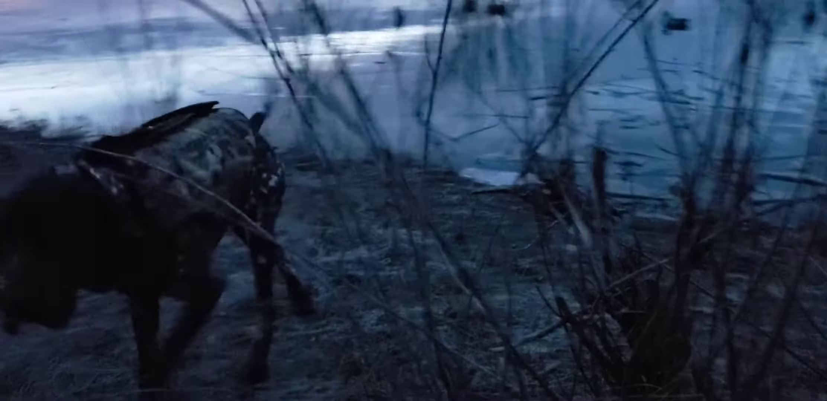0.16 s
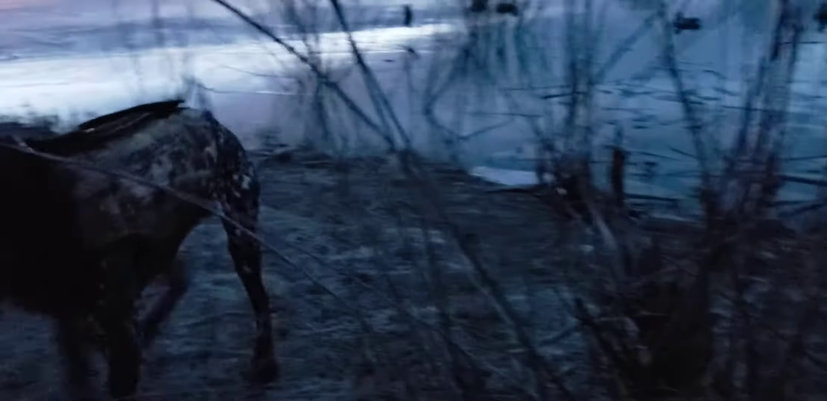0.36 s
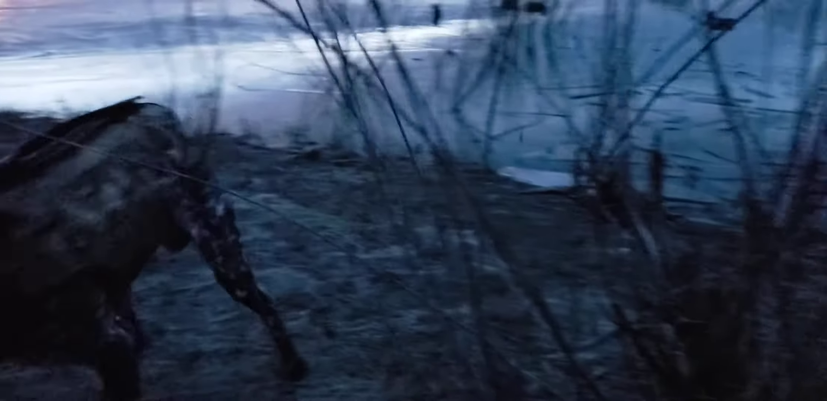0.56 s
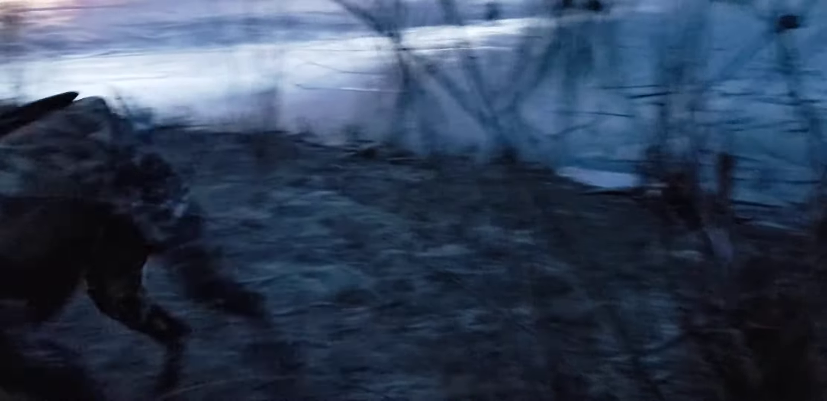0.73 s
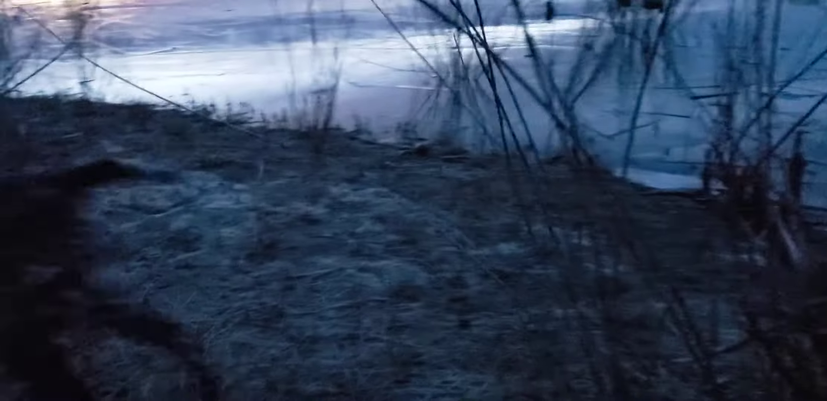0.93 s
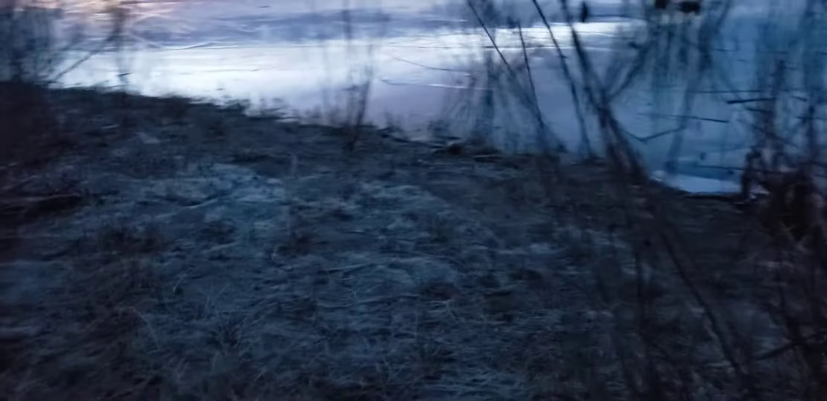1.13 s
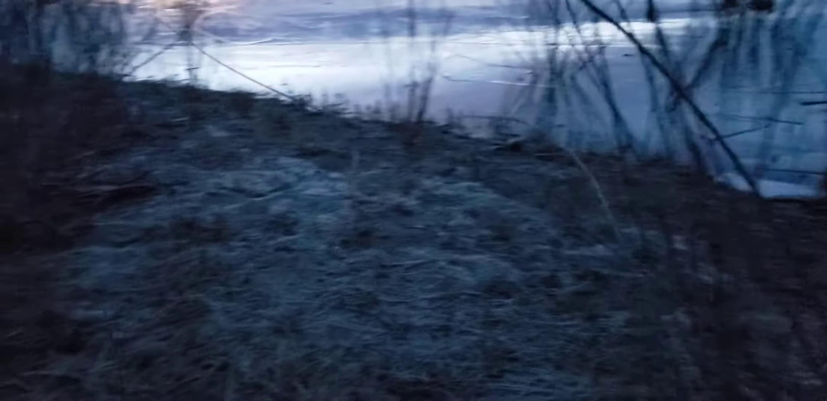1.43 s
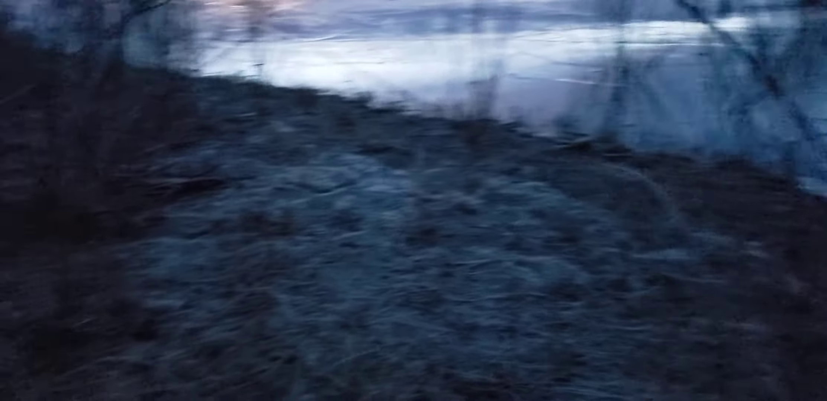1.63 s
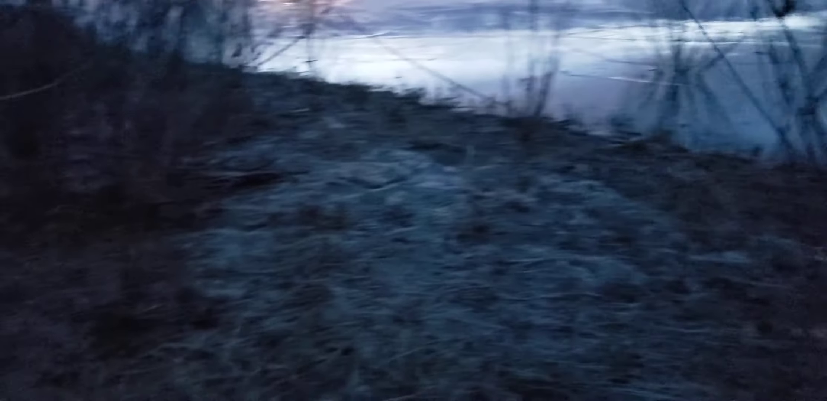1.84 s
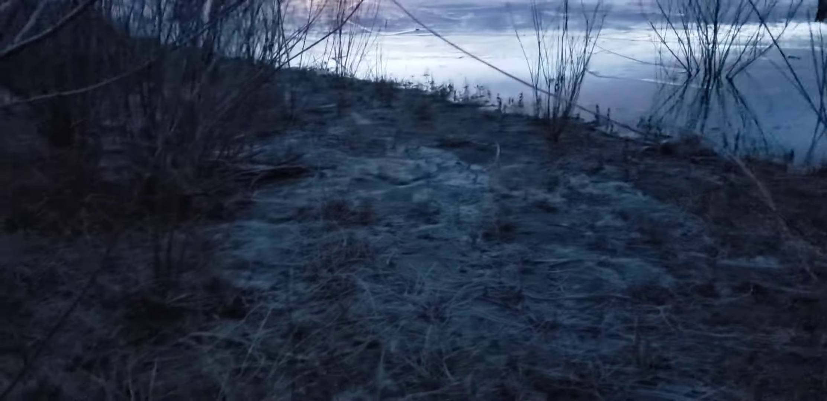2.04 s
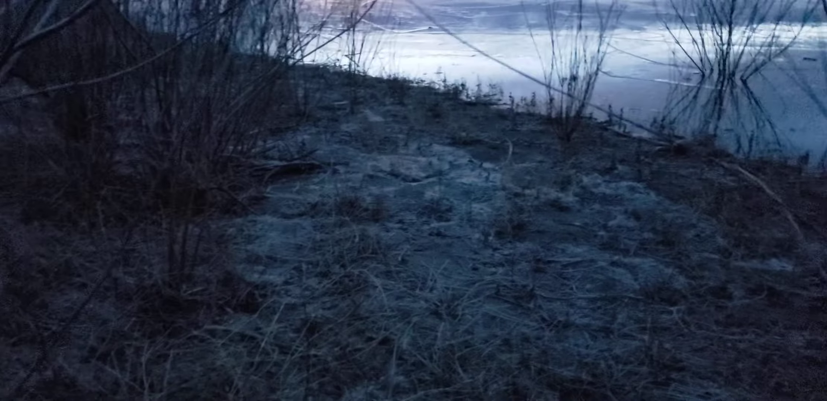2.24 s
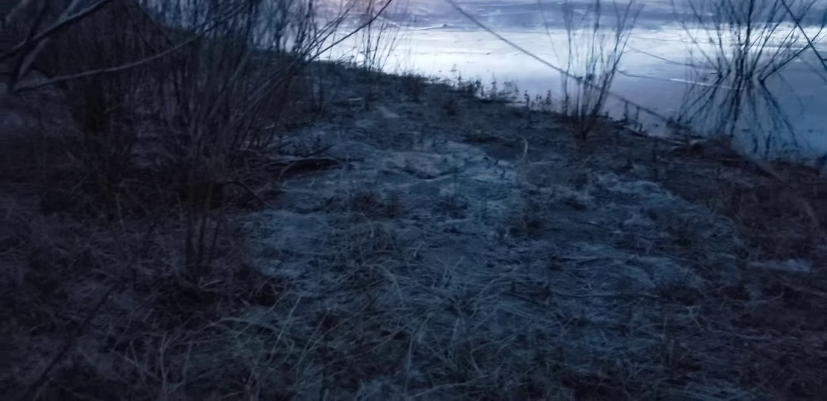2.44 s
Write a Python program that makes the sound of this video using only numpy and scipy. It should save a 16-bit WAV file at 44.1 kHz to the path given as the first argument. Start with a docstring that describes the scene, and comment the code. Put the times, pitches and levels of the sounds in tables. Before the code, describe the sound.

Crisp crackling of frozen grass and dry brush as a dog trots past, with sharp stem snaps

```python
"""A dog trots over frost-stiff grass and through dry brush, heard from a small hand-held camera.
A faint low hush and dull thuds, mostly in the right port, run throughout; a soft hoot rises early.
First two stems splinter close by, then ice-stiff blades snap and rustle further left.
Grass is noise shaped by breaks, twangs and thuds are damped sines, the hush is coloured noise."""
import sys
import numpy as np
from scipy import signal
from scipy.fft import rfft, irfft, next_fast_len
from scipy.io import wavfile

SR = 44100
rng = np.random.default_rng(int(sys.argv[2]) if len(sys.argv) > 2 else 0)


def int16_out(signal):
    """Quantize to a 16-bit WAV file."""
    q = np.round(np.clip(np.atleast_2d(signal).T, -1, 1) * 32767)
    wavfile.write(sys.argv[1], SR, q.astype(np.int16))


N = 112455


def amp(db):
    """dB to gain."""
    return 10 ** (np.asarray(db) / 20)


def unit(x):
    """Scale to rms 1."""
    return x / np.sqrt(np.mean(x ** 2) + 1e-20)


def coloured(x, points):
    """Filter x by a minimum-phase response of energy 1 through (Hz, dB) points."""
    point_hz, point_db = np.transpose(points)
    hz = np.fft.rfftfreq(8192, 1 / SR)
    db = np.interp(np.log(hz + 1), np.log(point_hz + 1), point_db)
    cepstrum = irfft(np.log(amp(db) + 1e-4))
    cepstrum[1:4096] *= 2  # fold to minimum phase
    cepstrum[4097:] = 0
    response = irfft(np.exp(rfft(cepstrum)))
    response /= np.linalg.norm(response)
    return signal.fftconvolve(x, response[None], axes=1)[:, :N]


def pair(shared):
    """White noise for two ports with a shared fraction of power."""
    noise = rng.standard_normal((3, N))
    return np.sqrt(shared) * noise[0] + np.sqrt(1 - shared) * noise[1:]


def crackle(per_s, spread_db, t60_s, bed):
    """Envelope of rms 1: random decaying breaks of uneven size over a steady bed."""
    struck = rng.random(N) < per_s / SR
    size = np.minimum(rng.exponential(size=N), 4)
    hits = struck * amp(2 * spread_db * size)
    power = signal.lfilter([1], [1, -amp(-120 / (t60_s * SR))], hits)
    return unit(np.sqrt(power / power.mean() + bed))


# Four bands throughout the grass: treble, middle, lower middle, body
BODY_DB = -8.5  # body of crunches, snaps and cracks re their lower middle

# Grass rustle: (time [s], treble [dB], middle [dB], lower middle [dB], body [dB])
RUSTLE_LEVELS = [(0.0, -54.5, -61.5, -79, -80), (0.09, -53.5, -62, -82, -81), (0.22, -47, -52, -69, -71),
                 (0.34, -51.5, -55, -73, -71.5), (0.55, -50, -53.5, -66, -63.5),
                 (0.82, -45.5, -51, -61, -59), (1.01, -47, -54, -60.5, -65.5),
                 (1.16, -42, -47, -59.5, -61.5), (1.26, -39.5, -47, -56, -69),
                 (1.38, -37, -42.5, -49.5, -59.5), (1.46, -35.5, -42.5, -53.5, -60),
                 (1.65, -42, -50, -57, -66), (1.84, -44.5, -50, -58.5, -78), (1.96, -38, -45.5, -51, -51.5),
                 (2.05, -44.5, -48.5, -53, -55), (2.16, -51.5, -55.5, -61, -69),
                 (2.35, -45.5, -54, -61, -77), (2.4, -52, -59, -71, -86), (2.55, -43, -49.5, -55.5, -76)]


def rustle_power():
    """Many small blade contacts: crackling band power on slow level curves."""
    t = np.arange(N) / SR
    time_s, *levels_db = np.transpose(RUSTLE_LEVELS)
    grains = [amp(np.interp(t, time_s, db)) * crackle(per_s=300, spread_db=3.5, t60_s=0.039, bed=1)
              for db in levels_db]
    return np.array(grains) ** 2


# Drawn-out crunches: (start [s], length [s], treble [dB], middle re treble [dB],
# lower middle re treble [dB], rise and fall [s])
CRUNCH_EVENTS = [(0.236, 0.031, -34, -1, -10, 0.0026), (0.246, 0.015, -32.5, -8, -15, 0.003),
                 (0.303, 0.051, -45, -14, -40, 0.012), (0.388, 0.032, -31.5, -8.5, -15, 0.0077),
                 (0.404, 0.014, -29, -8, -17.5, 0.0032), (0.657, 0.066, -49, -5, -8, 0.004),
                 (0.828, 0.059, -41.5, -6.5, -11.5, 0.0012), (0.917, 0.066, -43, -2, -10, 0.0042),
                 (1.07, 0.039, -35, -7, -27, 0.0074), (1.136, 0.045, -41, -7.5, -11, 0.0049),
                 (1.327, 0.0089, -21.5, -11, -22, 0.0025), (1.497, 0.024, -34.5, -14, -13, 0.0052),
                 (1.508, 0.069, -36.5, -6.5, -18.5, 0.017), (1.624, 0.047, -41.5, -4, -18, 0.0042),
                 (1.752, 0.039, -42.5, -4.5, -15.5, 0.0031), (1.836, 0.14, -37.5, -2, -6, 0.043),
                 (2.226, 0.047, -36, -9.5, -45, 0.015), (2.438, 0.038, -46.5, 0.5, -22, 0.0023)]


def crunch_power():
    """Dense splintering: fast crackle gated by trapezoids."""
    t = np.arange(N) / SR
    splinters = crackle(per_s=1300, spread_db=3.6, t60_s=0.014, bed=1)
    power = np.zeros((4, N))
    for start_s, length_s, db, mid_db, low_db, edge_s in CRUNCH_EVENTS:
        gate = np.clip(np.minimum(t - start_s, start_s + length_s - t) / edge_s, 0, 1)
        gains = amp(db + np.array([0, mid_db, low_db, low_db + BODY_DB]))
        power += np.outer(gains, gate * splinters) ** 2
    return power


# Blade and twig snaps: (time [s], level [dB], lower middle re level [dB],
# middle re level [dB], t60 [s]); SNAP_BAND_DB is added per band
SNAP_EVENTS = [(0.098, -30.5, -57, -21, 0.031), (0.77, -28, -34, -16, 0.03), (0.7852, -27, -18, -16, 0.081),
               (0.8113, -20.5, -13.5, -13.5, 0.033), (0.8266, -23, -21, -15, 0.043),
               (0.84, -27.5, -19.5, -12.5, 0.12), (0.856, -20, -17.5, -13, 0.033),
               (0.866, -28, -26, 0, 0.017), (0.9536, -21.5, -12, -12.5, 0.029),
               (1.051, -25.5, -51, -19.5, 0.069), (1.092, -24, -19.5, -20, 0.029),
               (1.112, -25, -37, -18, 0.023), (1.1418, -18, -33, -19, 0.049), (1.165, -24, -19, -13, 0.025),
               (1.1889, -18.5, -48, -22, 0.034), (1.2354, -19.5, -29, -26, 0.026),
               (1.245, -18.5, -28.5, -16, 0.029), (1.2892, -21, -42, -20.5, 0.025),
               (1.336, -17.5, -28, -23, 0.031), (1.37, -17, -24, -21, 0.034),
               (1.4342, -16.5, -23.5, -21, 0.033), (1.5865, -18.5, -29, -24, 0.037),
               (1.8986, -17.5, -9, -16, 0.013), (1.8238, -30, -22.5, -16.5, 0.12),
               (1.9215, -17, -14.5, -14, 0.022), (2.0145, -19.5, -11, -5, 0.019),
               (2.0195, -28, -15, -12, 0.036), (2.424, -36, -31, -11, 0.017)]
SNAP_BAND_DB = (-5, 5.5, 1)  # (treble [dB], middle [dB], lower middle [dB])
SNAP_RISE_S = 0.0006


def snap_power():
    """Sudden breaks: band power with a fast rise and exponential decay."""
    power = np.zeros((4, N))
    u = np.arange(SR // 10) / SR
    treble_db, middle_db, lower_db = SNAP_BAND_DB
    for time_s, db, low_db, mid_db, t60_s in SNAP_EVENTS:
        shape = amp(-60 * u / t60_s) * (1 - np.exp(-u / SNAP_RISE_S))
        low = lower_db + low_db
        gains = amp(db + np.array([treble_db, middle_db + mid_db, low, low + BODY_DB]))
        start = round(time_s * SR)
        power[:, start:start + len(u)] += np.outer(gains, shape) ** 2
    return power


# Single hard breaks: (time [s], treble [dB], middle re treble [dB], lower middle re treble [dB]);
# levels at burst start, before band colour
CRACK_EVENTS = [(.2378, -27, -8, -14), (.2453, -14, -16, -19), (.258, -5, -19, -15), (.393, -18, -16, -22),
                (.3958, -21, -12, -20), (.4045, -11, -20, -19), (.4063, -12, -20, -26),
                (.410, -14, -16, -9), (.557, -40, -3, -20), (.7245, -38, 0, -18), (.769, -29, 0, -16),
                (.7835, -28, 1, -16), (.8303, -24, -5, -14), (.8585, -25, -2, -12), (1.1478, -19, -7, -20),
                (1.1636, -18, -10, -20), (1.1652, -16, -8, -20), (1.1905, -19, -9, -28),
                (1.328, -15, -11, -19), (1.372, -23, -4, -11), (1.435, -16, -14, -25),
                (1.9102, -23, -8, -14), (2.368, -28, -9, -25), (2.4395, -32, -7, -16),
                (2.444, -27, -9, -16), (2.45, -30, -7, -14)]
CRACK_T60_S = 0.004


def cracks():
    """Very short bursts of random-sign noise, identical in both ports."""
    out = np.zeros((4, 1, N))
    u = np.arange(SR // 200) / SR
    for time_s, db, mid_db, low_db in CRACK_EVENTS:
        burst = amp(-60 * u / CRACK_T60_S) * np.sign(rng.standard_normal(len(u)))
        gains = amp(db + np.array([0, mid_db, low_db, low_db + BODY_DB]))
        start = round(time_s * SR)
        out[:, 0, start:start + len(u)] += np.outer(gains, burst)
    return out


# Relative band spectra: (frequency [Hz], density [dB per Hz])
TREBLE_COLOUR = [(6000, -84), (8200, 0), (9200, 1), (11500, 6.5), (13400, 8), (15000, 12), (16000, 3.5)]
MIDDLE_COLOUR = [(2060, -28.5), (3500, -10.5), (4790, -9), (5420, -7.5), (6760, -2), (7920, -6.5),
                 (8300, -39.5), (10800, -18.5), (18300, -120)]
NEAR_COLOUR = [(700, -19), (1300, -9.5), (1900, -0.5), (2400, -6), (3500, -18), (4550, -43)]  # lower middle of the close stems
LOWER_COLOUR = [(820, -21.5), (1700, -10), (2400, -3.5), (3000, -2.5), (3700, -9), (4550, -63.5)]  # lower middle of the later grass
BODY_COLOUR = [(180, -12), (300, -3.5), (858, 5.5), (1200, -0.5), (1400, 0), (1820, -58), (3080, -120)]
BAND_SHARED = (.45, .5, .55, .8)  # power fraction common to both ports, per band
NEAR_FADE_S = (0.5, 1.65)  # near colour gives way to lower colour


def grass():
    """Summed break power drives noise, cracks join it, and each band gets its colour."""
    power = rustle_power() + crunch_power() + snap_power()
    noise = np.array([pair(shared) for shared in BAND_SHARED])
    treble, middle, lower, body = noise * np.sqrt(power)[:, None] + cracks()
    near = np.interp(np.arange(N) / SR, NEAR_FADE_S, (1, 0))
    return (coloured(treble, TREBLE_COLOUR) + coloured(middle, MIDDLE_COLOUR)
            + coloured(lower * near, NEAR_COLOUR) + coloured(lower * (1 - near), LOWER_COLOUR)
            + coloured(body, BODY_COLOUR))


# Stem twangs: (time [s], starting frequency [Hz], peak level [dB], time to peak [s])
RING_EVENTS = [(.248, 2100, -33.5, 0.00073), (.812, 3340, -37, 0.0011), (1.001, 684, -42, 0.00084),
               (1.331, 2220, -29.5, 0.00056), (1.3415, 4650, -31.5, 0.0019), (1.9102, 3270, -24.5, 0.00029),
               (1.9895, 6600, -45, .0008), (2.028, 2250, -42, 0.0014)]
RING_RISE = 0.032  # fractional pitch climb per time to peak


def rings():
    """A stem twangs at its own climbing pitch, swelling and dying within milliseconds."""
    out = np.zeros(N)
    t = np.arange(SR // 20) / SR
    for time_s, hz, db, peak_s in RING_EVENTS:
        u = t / peak_s
        cycles = hz * t * (1 + RING_RISE * u / 2) + rng.random()
        start = round(time_s * SR)
        out[start:start + len(t)] += amp(db) * u * np.exp(1 - u) * np.sin(2 * np.pi * cycles)
    return out


# Grass position: (time [s], left port lead [ms], left minus right [dB])
PORT_LEAD = [(0, .057, -3), (.55, .057, -3), (.7, .3, 1.6), (1.1, .4, .4), (1.4, .46, .4), (2, .47, 1.3),
             (2.55, .47, .2)]


def spaced(x):
    """The left port hears the grass first, more so as the dog moves left."""
    hz, t, spectrum = signal.stft(x, SR, nperseg=256)
    time_s, lead_ms, pan_db = np.transpose(PORT_LEAD)
    lead_s = np.interp(t, time_s, lead_ms) / 1000
    half_turn = np.exp(1j * np.pi * np.outer(hz, lead_s))  # half the lead per port
    left = half_turn * amp(np.interp(t, time_s, pan_db) / 2)
    return signal.istft(spectrum * [left, 1 / left], SR, nperseg=256)[1][:, :N]


# Thuds: (time [s], peak before trim and pan [dB], frequency [Hz], left minus right [dB])
THUD_EVENTS = [(0.147, -49, 66.6, -24), (0.395, -44.5, 73, -18.5), (0.439, -48, 76.6, -22),
               (0.51, -50.5, 85, -24), (0.655, -53, 107, -20.5), (0.831, -44, 94.5, -10),
               (0.853, -45.5, 181, 0), (0.95, -53, 145, 0), (1.103, -50, 149, -11), (1.352, -47, 97, -13),
               (1.407, -45.5, 88, -14), (1.53, -52.5, 102, -15), (1.588, -43.5, 120, -10),
               (1.76, -58.5, 75.4, -25), (1.899, -47, 245, 4.5), (2.163, -59.5, 77, -38),
               (2.332, -49.5, 92, -18.5), (2.499, -41, 66, 0), (2.528, -43.5, 222, 1)]
THUD_T60_S, THUD_RISE_S, THUD_TRIM_DB = 0.15, 0.0018, -3.5


def thuds():
    """Each thud is a short damped low sine."""
    out = np.zeros((2, N + SR))
    t = np.arange(SR // 4) / SR
    envelope = amp(-60 * t / THUD_T60_S) * (1 - np.exp(-t / THUD_RISE_S))
    for time_s, db, hz, pan_db in THUD_EVENTS:
        swing = envelope * np.sin(2 * np.pi * hz * t)
        swing /= np.abs(swing).max()
        gains = amp(db + THUD_TRIM_DB + np.array([pan_db / 2, -pan_db / 2]))
        start = round(time_s * SR)
        out[:, start:start + len(t)] += np.outer(gains, swing)
    return out[:, :N]


# Hoot: (first frequency [Hz], last frequency [Hz], waver bandwidth [Hz], level before waver [dB])
HOOT = (249.5, 335, 132, -52)
HOOT_START_S, HOOT_END_S = 0.14, 0.31


def hoot():
    """A soft rising sine under a half-sine arch, its amplitude wavered by low noise."""
    first_hz, last_hz, width_hz, db = HOOT
    t = np.arange(N) / SR
    u = np.clip((t - HOOT_START_S) / (HOOT_END_S - HOOT_START_S), 0, 1)
    hz = first_hz + (last_hz - first_hz) * np.minimum(1.81 * u, 1)  # holds after the climb
    phase = 2 * np.pi * np.cumsum(hz) / SR
    waver = 0.5 + coloured(pair(0.64), [(1, 0), (width_hz / 2, 0), (4 * width_hz, -50)])
    return amp(db) * np.sin(np.pi * u) * waver * np.sin(phase)


# Hush spectrum: (frequency [Hz], relative density [dB per Hz])
HUSH_COLOUR = [(25, -45), (54, 4.5), (81, -2.5), (270, -9), (454, -30.5), (600, -25.5), (780, -60),
               (1320, -120)]
# Hush level: (time [s], level before trim and pan [dB])
HUSH_CURVE = [(0.0, -62), (0.08, -73.5), (0.36, -66), (0.6, -69), (1.19, -71.5), (1.53, -62.5),
              (1.73, -70.5), (1.94, -69), (2.34, -70.5), (2.4, -79), (2.55, -62.5)]
HUSH_TRIM_DB, HUSH_PAN_DB, HUSH_SHARED = 8.5, -3, 0.74  # pan: left minus right


def hush():
    """Low outdoor noise with a wavering level."""
    curve_db = np.interp(np.arange(N) / SR, *np.transpose(HUSH_CURVE))
    pan_db = np.array([[HUSH_PAN_DB / 2], [-HUSH_PAN_DB / 2]])
    return amp(HUSH_TRIM_DB + curve_db + pan_db) * coloured(pair(HUSH_SHARED), HUSH_COLOUR)


def scene():
    """Sum the placed grass and twangs, thuds, hoot and hush."""
    return spaced(grass() + rings()) + thuds() + hoot() + hush()


TOP_HZ = 15950


def record(dry):
    """The camera keeps nothing above its band limit."""
    size = next_fast_len(N + SR // 4)
    keep = np.fft.rfftfreq(size, 1 / SR) < TOP_HZ
    return irfft(rfft(dry, size) * keep, size)[:, :N]


dry = scene()
out = record(dry)
int16_out(out)
```